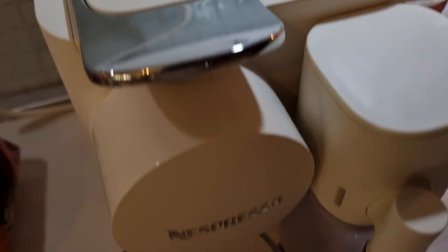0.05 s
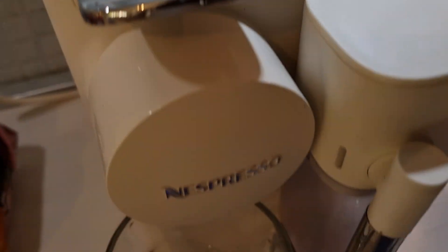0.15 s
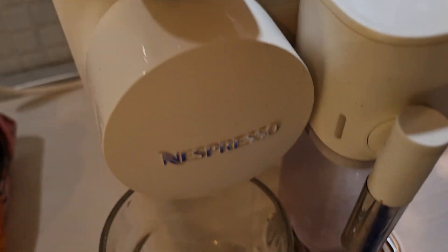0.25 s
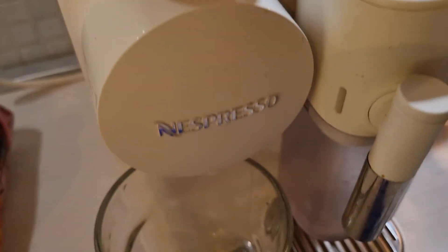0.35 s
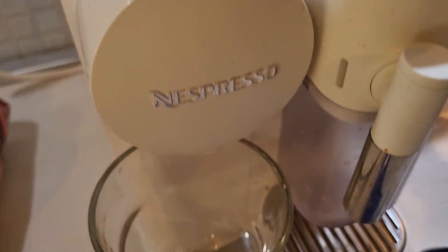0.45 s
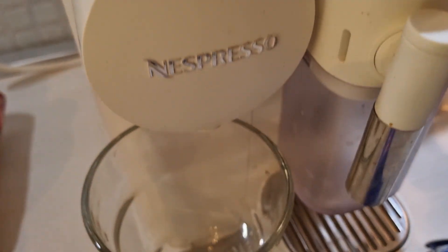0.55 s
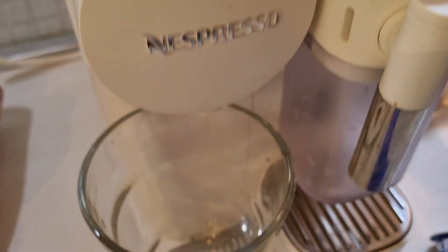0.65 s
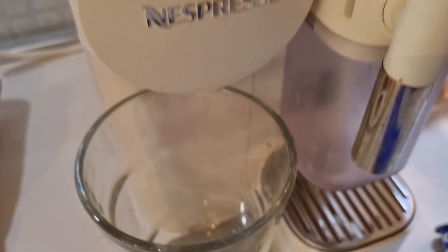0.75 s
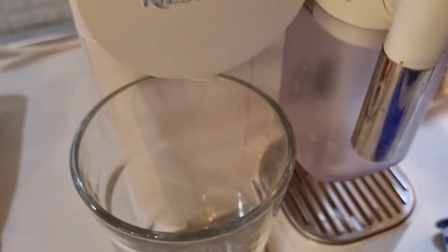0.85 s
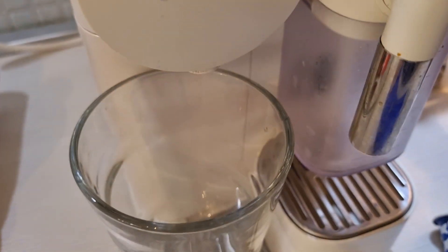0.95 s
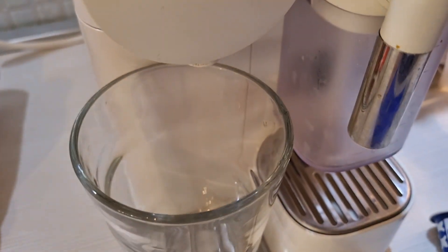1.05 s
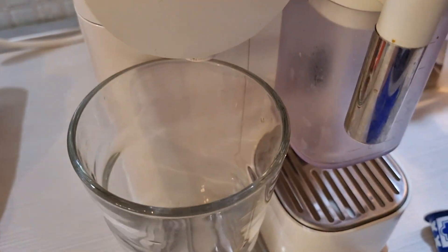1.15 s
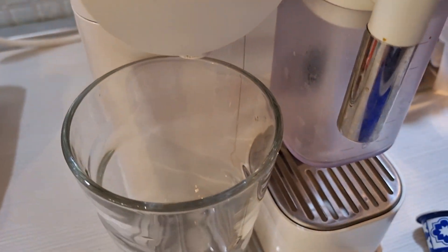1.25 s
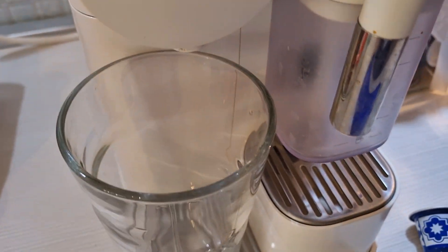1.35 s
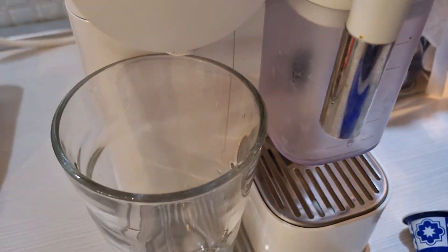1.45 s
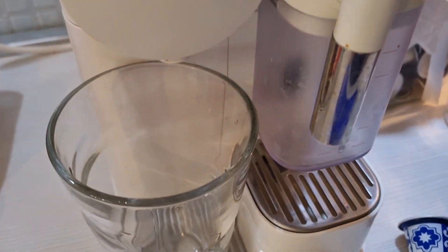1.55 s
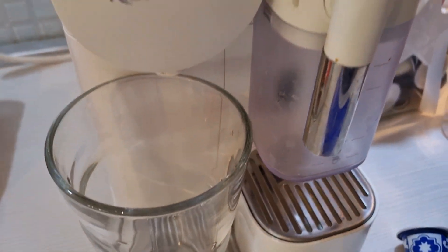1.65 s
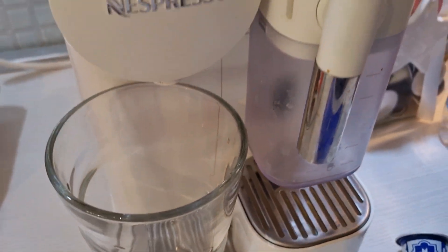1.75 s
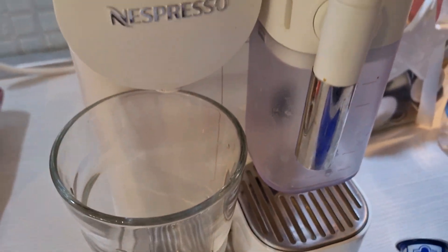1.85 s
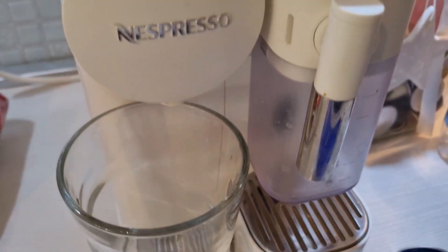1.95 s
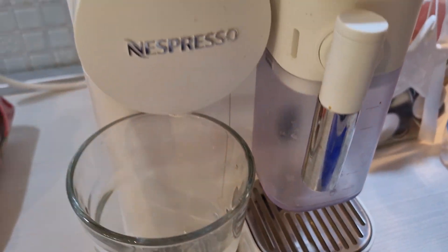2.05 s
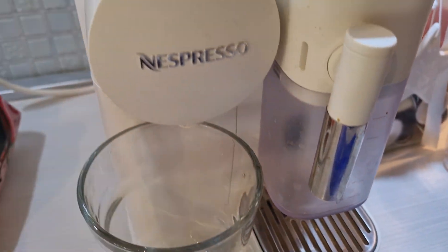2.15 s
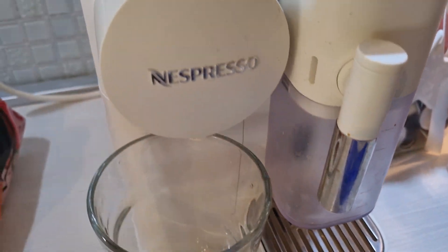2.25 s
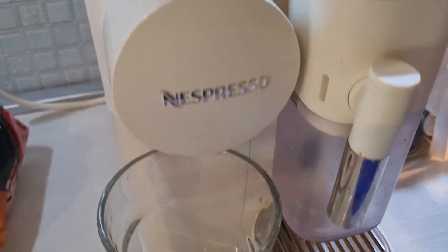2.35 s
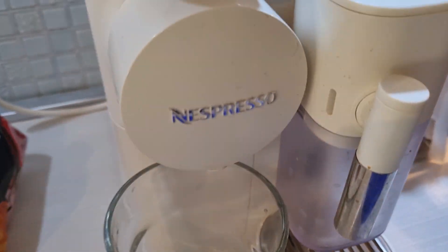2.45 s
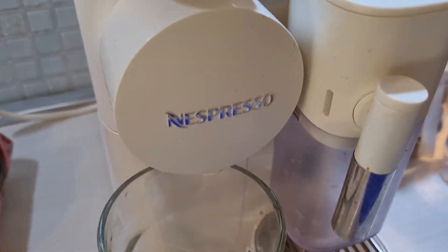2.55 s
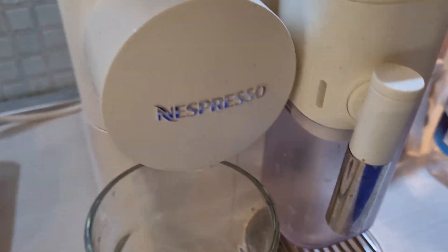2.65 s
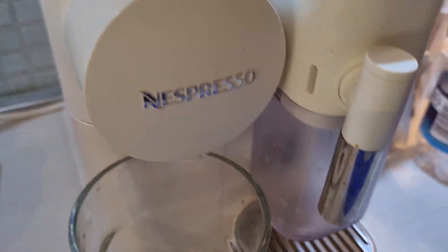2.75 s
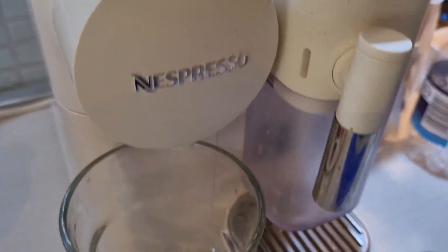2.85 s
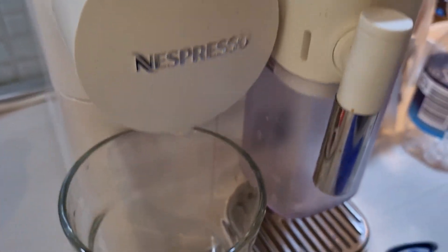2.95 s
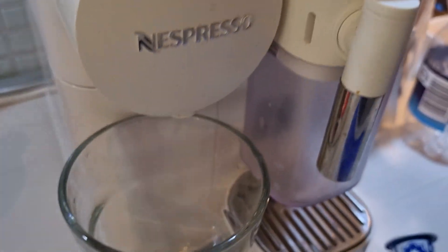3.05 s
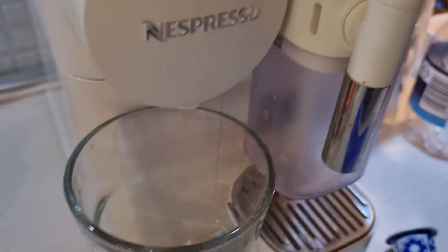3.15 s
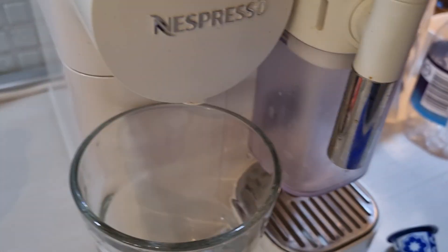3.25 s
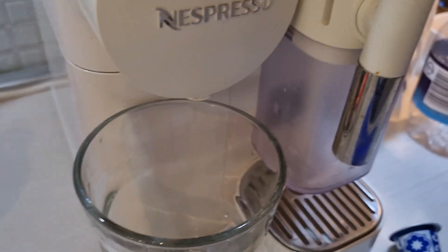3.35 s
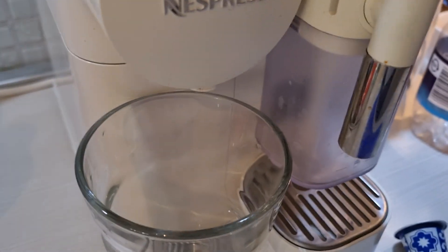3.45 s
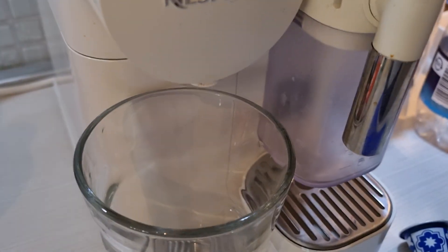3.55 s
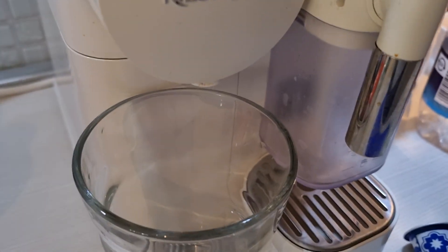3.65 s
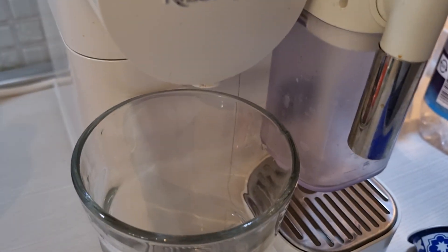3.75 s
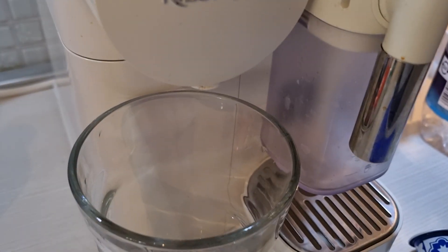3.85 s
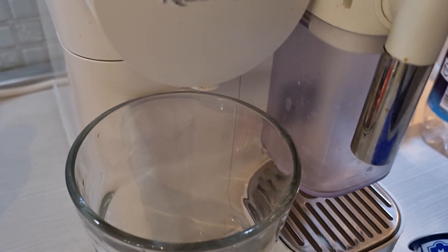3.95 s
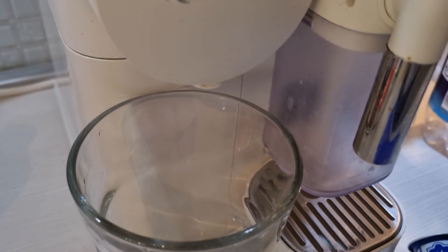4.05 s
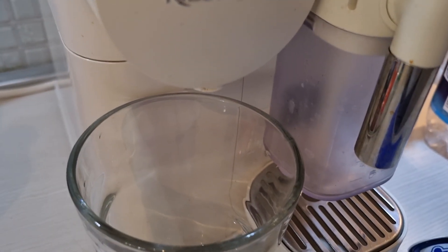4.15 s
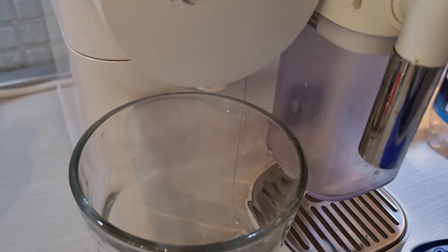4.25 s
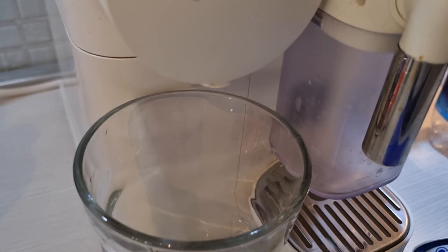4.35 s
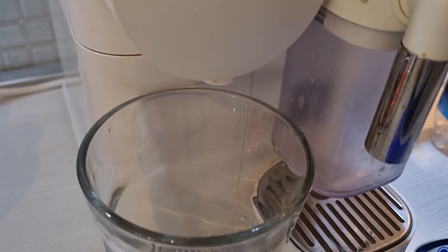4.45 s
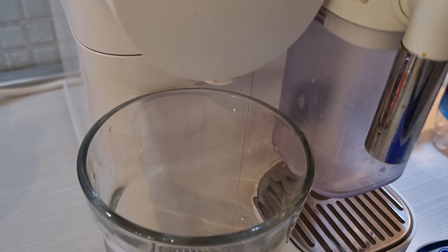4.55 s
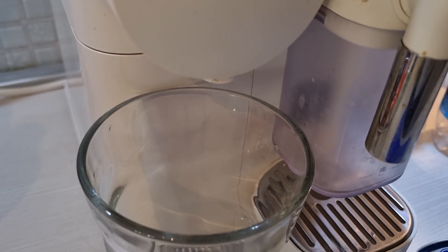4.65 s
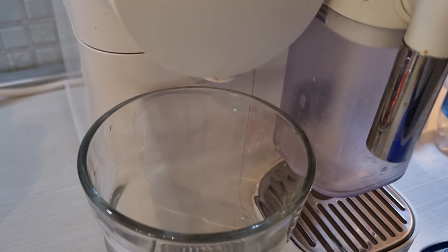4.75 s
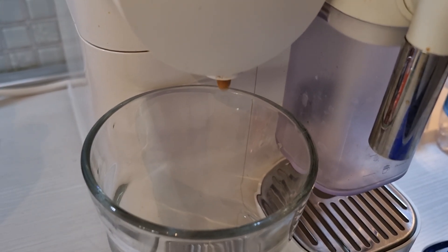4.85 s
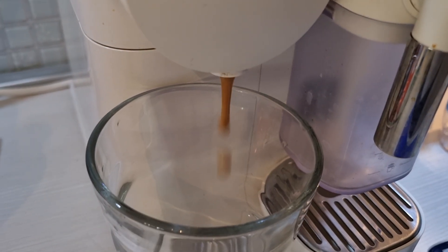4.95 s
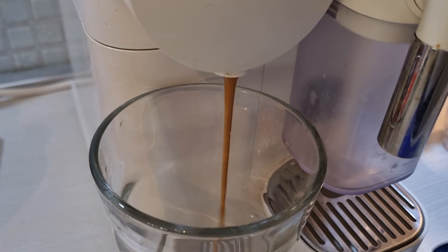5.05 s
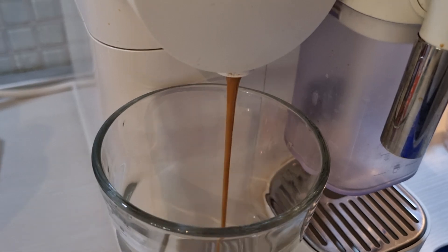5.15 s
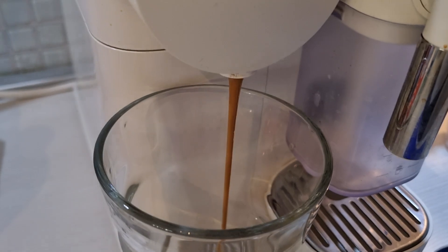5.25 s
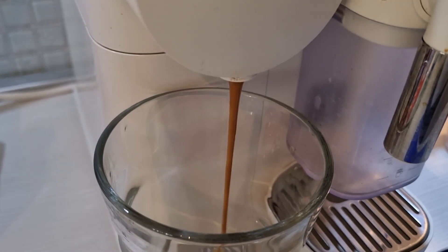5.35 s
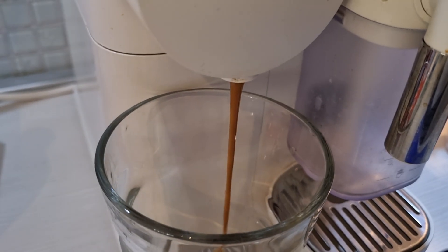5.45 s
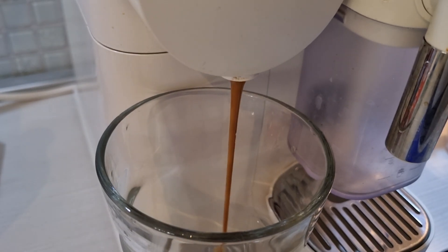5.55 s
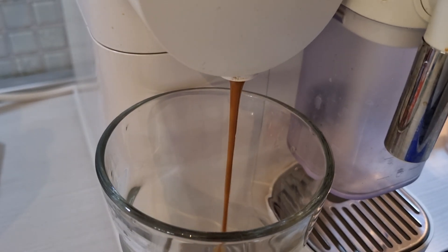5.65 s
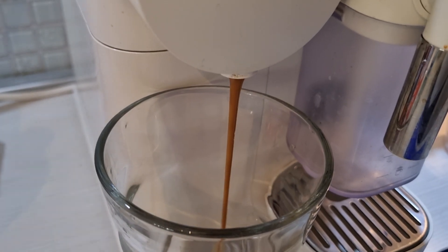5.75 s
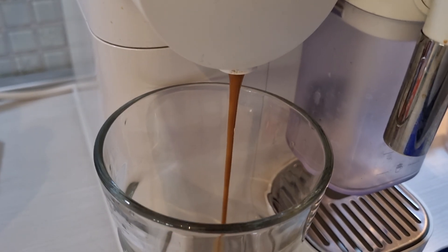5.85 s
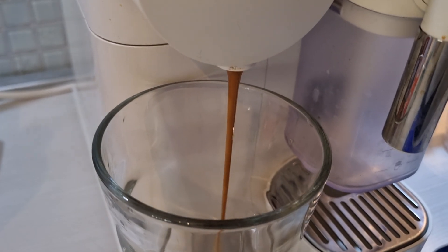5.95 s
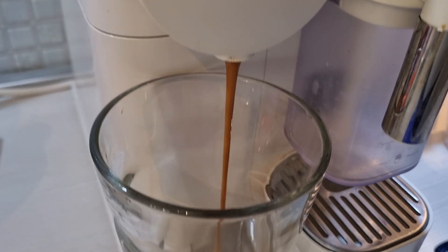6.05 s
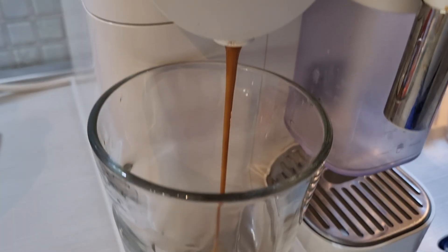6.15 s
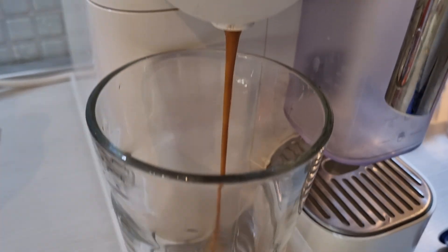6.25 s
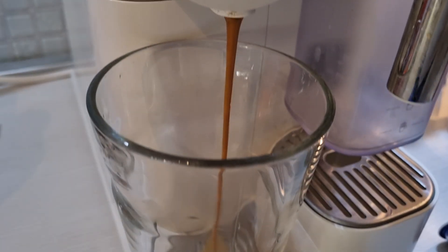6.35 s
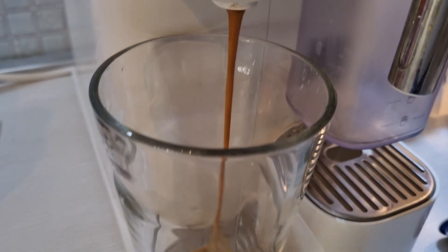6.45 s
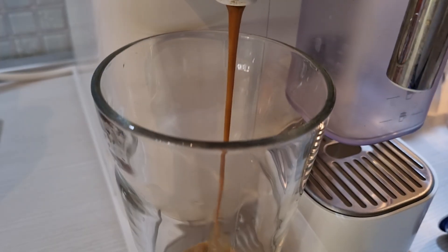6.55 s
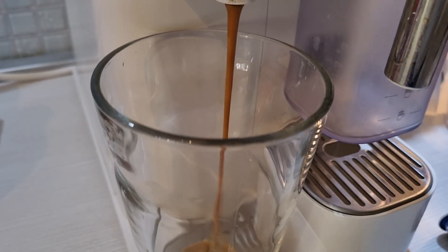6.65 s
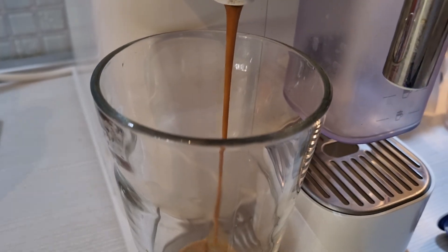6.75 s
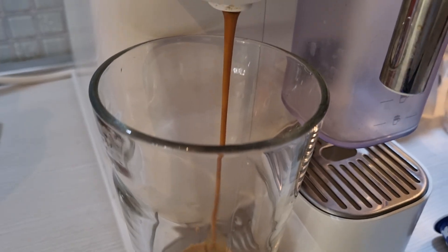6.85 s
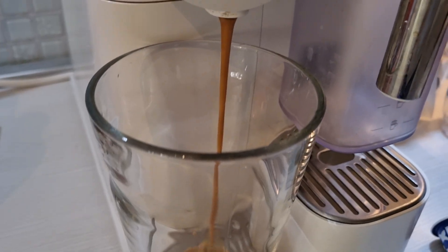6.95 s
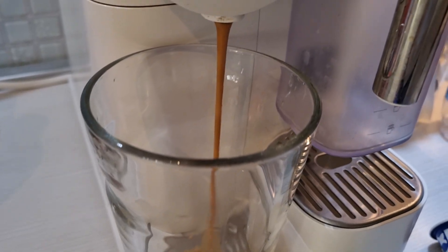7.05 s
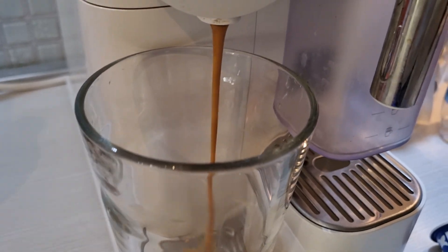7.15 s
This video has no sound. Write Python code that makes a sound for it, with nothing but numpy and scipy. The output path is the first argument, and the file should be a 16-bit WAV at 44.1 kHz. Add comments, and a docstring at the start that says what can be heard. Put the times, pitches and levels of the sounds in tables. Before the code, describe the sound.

Plastic parts are rubbed and knocked by hand, then after a brief hush a pump buzzes loudly, foil snaps, and coffee trickles into a glass.

```python
"""Capsule coffee machine on a kitchen counter

Faint room tone. A hand rubs and knocks plastic parts (stick-slip noise into resonances), then near quiet.
A mains-driven piston pump buzzes at 50 strokes a second: stroke-rate multiples plus ticks and gated noise,
loose and rattling at first, tighter as pressure builds. Scraped metal rings as the foil bursts;
coffee trickles into a glass as random pops through bubble resonances. Heard at a phone's two ports, close by."""
import sys
import numpy as np
from scipy import signal
from scipy.fft import rfft, irfft
from scipy.io import wavfile

SR = 44100
rng = np.random.default_rng(int(sys.argv[2]) if len(sys.argv) > 2 else 0)


def inscribe(sig):
    """Save sig as 16-bit PCM at rate SR to the path in sys.argv[1].

    A 1-D sig is mono; a 2-D sig holds one channel per row.
    Samples are clipped to [-1, 1] before scaling.
    """
    pcm = np.round(np.clip(np.atleast_2d(sig).T, -1, 1) * 32767)
    wavfile.write(sys.argv[1], SR, pcm.astype(np.int16))


N = 317520
T = np.arange(N) / SR
MAINS_HZ, PUMP_ON_S = 50, 2.277
PERIOD_MS = 1000 / MAINS_HZ
SIDES = np.array([[1], [-1]])  # left, right in opposite phase


def undb(db):
    """dB to amplitude ratio."""
    return 10 ** (np.asarray(db) / 20)


def unit(x):
    """Scale to RMS 1."""
    return x / np.sqrt(np.mean(x ** 2))


def curve(table):
    """Two-column table joined by straight lines in time."""
    t_s, value = np.transpose(table)
    return np.interp(T, t_s, value)


def bump(at_s, width_s):
    """Bell-shaped rise and fall, top 1."""
    return np.exp(-((T - at_s) / width_s) ** 2)


def touch(start_s, length_s, attack_s, release_s):
    """Envelope: straight attack, hold, exponential release."""
    attack = np.clip((T - start_s) / attack_s, 0, 1)
    return attack * np.exp(-np.maximum(T - start_s - length_s, 0) / release_s)


def walk(rate_hz):
    """Smooth random wander, spread about 1."""
    points = rng.standard_normal(int(N / SR * rate_hz) + 4)
    points = np.convolve(points, [.5, .7, .5], "same")
    return np.interp(T * rate_hz, np.arange(len(points)), points)


def pair(alike):
    """Noise at the two ports; alike (0-1) is the power share in phase, the rest is in opposite phase."""
    mid, side = rng.standard_normal((2, N))
    return np.sqrt(alike) * mid + np.sqrt(1 - alike) * side * SIDES


def crackle(per_s, spread_db):
    """Random slips of either sign and very uneven size."""
    chance = rng.random((3, N))
    slips = chance[0] < per_s / SR
    size = undb(-spread_db * np.log(chance[2] + 1e-4))
    return slips * np.sign(chance[1] - .5) * size


def colour(x, spectrum):
    """Filter by (f/Hz, level/dB) points, straight in log frequency."""
    hz, db = np.transpose(spectrum)
    f_hz = np.arange(N // 2 + 1) * SR / N + 1
    gain = undb(np.interp(np.log(f_hz), np.log(hz), db))
    return irfft(rfft(x) * gain, N)


def rings(x, modes):
    """Sum of resonances (f/Hz, width/Hz, level/dB), neighbours in opposite phase."""
    out = 0
    for k, (hz, width_hz, db) in enumerate(modes):
        out = out + (-1) ** k * undb(db) * signal.lfilter(*signal.iirpeak(hz, hz / width_hz, SR), x)
    return out


def split(x, hz, kind, order):
    """Butterworth low- or high-pass."""
    return signal.sosfilt(signal.butter(order, hz, kind, fs=SR, output="sos"), x)


# room tone spectrum: f/Hz, relative level/dB per Hz
ROOM_TONE = [(15, -39), (25, -15), (33, -17), (64, -8.5), (82, -2.5), (104, 0.5), (130, -8), (205, -18.5),
             (324, -12), (654, -28), (1320, -31.5), (6490, -43), (15800, -50)]
ROOM_TONE_DB = -69


def kitchen():
    """Faint room tone: coloured noise with a flickering level, bass alike on both sides."""
    mid, side = (colour(rng.standard_normal(N), ROOM_TONE) for _ in range(2))
    side = split(side, 400, "high", 1)
    return unit(mid + side * SIDES) * undb(ROOM_TONE_DB + 2.0 * walk(5.16))


# hand on the parts: start t/s, length/s, rub level/dB, skin hiss level/dB
RUBS = [(0.235, 0.068, -53, -58.5), (0.346, 0.016, -45, -51), (0.412, 0.12, -58, -66),
        (0.543, 0.11, -53.5, -57.5), (0.649, 0.088, -42, -52), (0.757, 0.017, -43, -48),
        (0.804, .12, -42, -54), (0.94, .12, -52.5, -53), (1.071, 0.14, -50, -58), (1.266, 0.4, -79, -82),
        (1.648, .12, -77, -82)]
# counter bumped: t/s, level/dB
THUDS = [(.285, -48), (.355, -48.5), (.56, -52), (.765, -43), (.92, -60), (1.1, -57), (1.174, -53),
         (1.675, -63)]
# plastic resonances: f/Hz, width/Hz, relative level/dB
PLASTIC = [(490, 70, -2), (1050, 160, -1), (1453, 180, 4), (1985, 400, 0.5), (3110, 100, -5.5),
           (3380, 310, -9), (5870, 1040, -6), (12600, 740, -10), (14600, 2000, -19.5)]
# resonance of the squeak in the last rub: f/Hz, width/Hz, relative level/dB
SQUEAK_MODE = [(1940, 57, 0)]
SQUEAK_S, SQUEAK_LENGTH_S, SQUEAK_DB = 1.7, 0.046, -66.5
LEAN_S, LEAN_LENGTH_S, LEAN_DB = 0.24, 0.68, -64.5
RUB_ATTACK_S, RUB_RELEASE_S = 0.028, 0.027
THUD_ATTACK_S, THUD_RELEASE_S = 0.0069, 0.02


def rub_envelope(start_s, length_s):
    """Onset and release of rubbing or leaning."""
    return touch(start_s, length_s, RUB_ATTACK_S, RUB_RELEASE_S)


def counter_thuds():
    """Noise through low resonances: the counter is bumped, and rumbles while the hand leans on it."""
    level = undb(LEAN_DB) * rub_envelope(LEAN_S, LEAN_LENGTH_S)
    for s, db in THUDS:
        level = level + undb(db) * touch(s, THUD_ATTACK_S, THUD_ATTACK_S, THUD_RELEASE_S)
    noise = rng.standard_normal(N) * undb(2 * walk(30))
    return level * unit(rings(noise, [(114, 23, 2), (420, 270, -12)]))


def hand():
    """Stick-slip rubbing rings the plastic; skin hisses above 2.8 kHz, the counter thuds."""
    rub, hiss = sum(undb(dbs)[:, None] * rub_envelope(s, length) for s, length, *dbs in RUBS)
    judder = signal.lfilter([1], [1, -.993], np.abs(crackle(90, 4.9)))
    slips = pair(0.4) + .5 * unit(crackle(900, 1.9))
    slips = slips * (3.7 + unit(judder))
    body = undb(-29.0) * slips
    for k, mode in enumerate(PLASTIC):
        # the grip shifts, so each resonance comes and goes on its own
        body = body + (-1) ** k * undb(3.3 * walk(29.8)) * rings(slips, [mode])
    low, high = (split(body, 2800, kind, 3) for kind in ("low", "high"))
    squeak = undb(SQUEAK_DB) * rub_envelope(SQUEAK_S, SQUEAK_LENGTH_S) * unit(rings(slips, SQUEAK_MODE))
    return rub * unit(low) + hiss * unit(high) + counter_thuds() + squeak


# knocks: t/s, level/dB, ring f/Hz, crack level/dB re the knock
KNOCKS = [(0.274, -36.5, 1150, -22), (0.292, -41, 1900, -2), (0.302, -40, 1220, -24),
          (0.315, -26.5, 1074, -30), (0.357, -30.5, 1380, -13), (0.366, -38.5, 880, -20),
          (0.487, -42.5, 1120, -31), (0.559, -38.5, 1140, -25), (0.572, -40, 980, -27),
          (0.666, -39, 1420, -13), (0.725, -39, 1490, -19), (0.766, -30, 1450, -16),
          (0.811, -49, 1620, -22), (0.841, -35.5, 1530, -16), (0.877, -32, 1470, -13),
          (0.922, -33.5, 1530, -16), (0.988, -35.5, 1860, -5.5), (1.105, -40, 1520, -20),
          (1.154, -36, 1020, -39), (1.212, -54, 1560, 7), (1.327, -58, 1920, -10), (1.37, -51.5, 495, -30),
          (1.672, -58, 1860, -20), (1.756, -60, 1960, -28), (2.279, -26, 370, -1.5),
          (4.211, -24, 2110, -22), (4.317, -37, 1960, -12), (4.344, -25, 1300, -13),
          (7.086, -25, 1198, -34)]


def knocks():
    """Each knock: a short decaying ring with an overtone, a treble crack and a noisy tail."""
    out, t = np.zeros(N + 4096), T[:4096]
    for s, db, hz, crack_db in KNOCKS:
        noise = rng.standard_normal((2, len(t)))
        ring = np.sin(2 * np.pi * hz * t) * np.exp(-t / 0.0041)
        overtone = .5 * np.sin(2 * np.pi * 1.65 * hz * t) * np.exp(-t / 0.0021)
        tail = 0.68 * signal.lfilter(*signal.iirpeak(hz, 1.2, SR), noise[0]) * np.exp(-t / 0.019)
        crack = undb(crack_db) * np.diff(noise[1], prepend=0) * 0.7 * np.exp(-t / 0.0046)
        onset = 1 - np.exp(-t / 0.00037)
        start = int(s * SR)
        out[start:start + len(t)] += undb(db) * (ring + overtone + tail + crack) * onset
    return out[:N]


# case and counter, one row per multiple 1-7 of the stroke rate:
# level/dB at rest, then dB added at full pressure, at full stroke, at the top of the swell
BOOM = [(-51, -3.5, 1.2, 2.5), (-48, 0.5, 7.5, 8.5), (-43.5, 4.5, 13, 1.1), (-35.5, -4, -2.5, 3),
        (-30.5, -5, 6.5, -3), (-41, -10, 1.2, 1), (-49.5, 4.5, 25, -13)]
# brief fades and swells, {multiple: rows of t/s, width/s, level change/dB}
WAVERS = {1: [(2.33, 0.047, 8)], 4: [(3.86, 0.16, -12), (4.92, 0.43, -11.5)], 5: [(4.2, 0.2, -2.5),
          (4.75, 0.32, 4)], 6: [(3.4, 0.13, 5), (4.05, 0.089, 10), (4.65, 0.1, -8.5)]}


def boom(back, state, loose):
    """Stroke-rate multiples 1-7; a loose case lets its resonances slide, so they drift apart in phase."""
    levels_db = np.array(BOOM) @ state
    for k, wavers in WAVERS.items():
        levels_db[k - 1] += sum(db * bump(s, width) for s, width, db in wavers)
    out = 0
    for k, db in enumerate(levels_db, start=1):
        level = np.sqrt(2) * undb(db + 0.39 * loose * walk(25.55))
        drift_rad = 0.063 + loose * (2.37 * walk(1.26) + 0.089 * walk(8.9))
        out = out + level * np.cos(2 * np.pi * k * back + drift_rad)
    return out


def rumble(loose):
    """Noise through broad low resonances, louder while the case is loose."""
    noise = rng.standard_normal(N)
    return undb(-49 + 7.6 * loose) * unit(rings(noise, [(74.0, 32, -1), (197, 163, 1), (607, 890, -10)]))


# multiples 8 up: level/dB re the buzz when pumping freely, level/dB re the buzz against the coffee
PARTIALS = [(-12, -2.5), (-22, -4.5), (-21, -7), (-15.5, 3), (-20, -5), (-19, 3.5), (-20, -11.5),
            (-6.5, -8), (-15.5, -20), (-17, -15), (-16.5, -9), (-16, -60), (-15, -9.5), (-14, -18),
            (-9.5, -20), (-15, -6), (-42, 0)]
SPREAD_RAD = .012  # phase lag, times multiple squared


def buzz(back, pressure, loose):
    """Stroke-rate multiples from 8 up; pressure shifts the balance, looseness makes them waver."""
    out = 0
    for k, (free_db, loaded_db) in enumerate(PARTIALS, start=8):
        db = free_db + pressure * (loaded_db - free_db) + 2 * loose * walk(12)
        drift_rad = loose * (2.0 * walk(0.56) + 0.76 * walk(13))
        out = out + undb(db) * np.cos(2 * np.pi * k * back - SPREAD_RAD * k ** 2 + drift_rad)
    return out


# piston bounces: delay after strike/ms, level/dB, noise decay/ms
BOUNCES = [(0, 2.5, 0.8), (1.6, -7.5, 4.5), (3.8, -5.5, 1.6), (9.5, -9, 1.44)]


def strike_ticks(strike, loose):
    """One impulse train per bounce, of uneven size while loose."""
    uneven = undb(1.5 * loose * rng.standard_normal(N))
    ticks = []
    for at_ms, db, _ in BOUNCES:
        hit = np.diff(np.floor(strike - at_ms / PERIOD_MS), prepend=0) > 0
        ticks.append(undb(db) * uneven * hit)
    return ticks


def strike_gate(strike, loose):
    """Noise level within each stroke: a floor plus a decay per bounce; strokes differ while loose."""
    gate = 0.31
    for at_ms, db, decay_ms in BOUNCES:
        gate = gate + undb(db) * np.exp(-((strike * PERIOD_MS - at_ms) % PERIOD_MS) / decay_ms)
    stroke_number = (strike - strike.min()).astype(int)
    return gate * undb(0.52 * loose * rng.standard_normal(N // 800)[stroke_number])


# pump bracket, short rings while loose: f/Hz, width/Hz, relative level/dB
BRACKET_FREE = [(1385, 47, 3), (1700, 53, -18)]
# pump bracket, longer rings once held tight: f/Hz, width/Hz, relative level/dB
BRACKET_LOADED = [(1455.5, 10, 21.5), (1220, 120, -10.5), (1522, 9, 3.5)]


def bracket(tick, pressure):
    """First tick of each stroke rings the bracket; pressure crossfades loose to tight."""
    free = unit(rings(rings(tick, [(1396, 480, 0)]), BRACKET_FREE))
    loaded = unit(rings(rings(tick, [(1293, 190, 0)]), BRACKET_LOADED))
    return (1 - pressure) * free + undb(-2.0) * pressure * loaded


def stroke_habit():
    """Noise in mains-period frames, each much like the one before."""
    frames = pair(.7).reshape(2, -1, SR // MAINS_HZ)
    return unit(signal.lfilter([1], [1, -.97], frames, axis=1).reshape(2, N))


# loose panels: f/Hz, width/Hz, relative level/dB
PANELS = [(731, 56, 0.5), (970, 310, -3.5), (1477, 159, 6), (1906, 103, -3), (2175, 840, -9)]


def rattle(gate, habit, alike):
    """Stroke-gated noise and crackle through the panel resonances."""
    fresh = pair(0.86) + 0.46 * unit(crackle(1500, 1.2))
    return unit(rings(gate * (np.sqrt(alike) * habit + np.sqrt(1 - alike) * fresh), PANELS))


# panel rasps, while the case is loose and again as coffee flows: t/s, width/s, level/dB
RASPS = [(3.15, 0.54, -35.5), (5.5, .6, -51)]
# rasping panel: f/Hz, width/Hz, relative level/dB
RASP_MODES = [(1820, 160, 8.5), (2050, 210, 6)]


def rasp(gate):
    """Stroke-gated, unsteady noise through panel resonances, in two swells."""
    level = sum(undb(db) * bump(s, width) for s, width, db in RASPS)
    return level * unit(rings(gate * pair(.7) * undb(6.4 * walk(20)), RASP_MODES))


# chatter hiss spectrum: f/Hz, relative level/dB per Hz
CHATTER = [(1060, -13.5), (1800, 0), (3490, -2), (4010, -2.5), (4630, -4.5), (7500, -14.5), (8290, -31.5),
           (9080, -27), (10900, -28.5), (14600, -28.5), (15800, -44)]
# valve and piston housing: f/Hz, width/Hz, relative level/dB
VALVE = [(1930, 90, -1), (2450, 40, -5), (2610, 50, 0), (3260, 60, -8), (3950, 130, 0), (4300, 90, -5),
         (5600, 200, -7), (7300, 250, -14), (9400, 400, -21), (13000, 600, -20)]


def chatter(gate, habit, alike, ticks, bright_db, pressure):
    """Gated noise as hiss, plus the housing rung by noise and ticks, stronger under pressure."""
    shake = gate * (np.sqrt(alike) * habit + np.sqrt(1 - alike) * pair(0.25))
    hiss = colour(shake, CHATTER)
    # extra gating sharpens the puffs above 8 kHz
    hiss = hiss + undb(bright_db) * unit(gate) ** 0.33 * split(hiss, 8000, "high", 2)
    housing = unit(rings(shake, VALVE)) + undb(-12.0) * unit(rings(sum(ticks), VALVE))
    return unit(hiss) + undb(4 * pressure - 4) * housing


# piston stroke grows, stalls while the foil resists, recovers, settles: t/s, stroke length 0-1
STROKE = [(2.5, 0.07), (2.95, .48), (3.4, 0.88), (3.7, 0.93), (3.9, 0.64), (4.15, 0.1), (4.5, .19),
          (4.7, 0.52), (4.95, 0.66), (5.45, 0.4), (6.2, 0.21), (7.2, .13)]
# t/s, water pressure 0-1
PRESSURE = [(3.2, 0.06), (4.2, 0.42), (5.2, .53), (6.35, 0.66)]
# each: level/dB at rest, then dB added at full pressure, at full stroke, at the top of the swell
BUZZ_DB = (-39.5, -3.5, 5, 1)
BRACKET_DB = (-37.5, -8.5, 3, 0.2)
RATTLE_DB = (-43.5, -5.5, 1, 8.5)
CHATTER_DB = (-44, -8.5, 5, 1)
# same columns: added hiss above 8 kHz re the rest
BRIGHT_DB = (7.5, -4, -1.5, 6)
SWELL_S, SWELL_WIDTH_S = 4.09, 1.59
STRIKE_MS, LONG_STROKE_MS, PRESSED_MS = 12, .6, -.9  # strike into each mains cycle; added at full stroke, pressure
RETURN_MS = 5.43  # spring throws the piston back against its stop


def pump():
    """Stroke-rate multiples from the piston return; ticks and noise from each strike and bounce."""
    stroke, pressure = curve(STROKE), curve(PRESSURE)
    state = np.array([np.ones(N), pressure, stroke, bump(SWELL_S, SWELL_WIDTH_S)])
    level_tables = np.array([BUZZ_DB, BRACKET_DB, RATTLE_DB, CHATTER_DB, BRIGHT_DB])
    buzz_db, bracket_db, rattle_db, chatter_db, bright_db = level_tables @ state
    loose = 1 - .9 * pressure

    # piston positions in cycles
    strike = MAINS_HZ * T - (STRIKE_MS + LONG_STROKE_MS * stroke + PRESSED_MS * pressure) / PERIOD_MS
    # alternate strokes differ a little, which sounds half-way tones
    alternate = 0.002 * np.sin(np.pi * MAINS_HZ * T)
    back = MAINS_HZ * T - RETURN_MS / PERIOD_MS + alternate + 0.0017 * loose * walk(40)

    ticks = strike_ticks(strike, loose)
    gate = strike_gate(strike, loose)
    # valve and panels shake much as they did a stroke ago, the more so under pressure
    habit = stroke_habit()
    alike = np.clip(.2 + 1.1 * pressure ** 2, 0, .97)

    out = boom(back, state, loose) + rumble(loose)
    out = out + undb(buzz_db) * buzz(back, pressure, loose)
    out = out + undb(bracket_db) * bracket(ticks[0], pressure)
    out = out + rasp(gate)
    out = out + undb(rattle_db) * rattle(gate, habit, alike)
    out = out + undb(chatter_db) * chatter(gate, habit, alike, ticks, bright_db, pressure)
    return out * np.clip((T - PUMP_ON_S) / 0.0091, 0, 1)


# scrapes: start t/s, length/s, bite at the start/dB,
# then level/dB of rings near 9 kHz, at 12-15 kHz, near 2 kHz, and of the broad hiss
FOIL = [(4.207, 0.095, 9.5, -51.5, -58, -42.5, -66), (4.312, 0.038, -10, -59, -48, -37.5, -42.5)]
# three ring groups, same order: f/Hz, width/Hz, relative level/dB
FOIL_RINGS = [
    [(8970, 90, 5), (9300, 84, -3)],
    [(12100, 300, -5), (14800, 200, -1)],
    [(2020, 57, 0)],
]
FOIL_ATTACK_S, FOIL_RELEASE_S, FOIL_BITE_S = 0.0045, .012, 0.0057
FOIL_PANS_DB = (5., 0., -3.)  # left up, right down by this; the 9 kHz whistle sits left


def foil():
    """Bursting foil: a two-part scrape of noise and crackle rings metal in three groups."""
    scrape = pair(0.25) + unit(crackle(800, 1.5))
    levels = 0
    for s, length, bite_db, *dbs in FOIL:
        hold = touch(s, length, FOIL_ATTACK_S, FOIL_RELEASE_S)
        bite = undb(bite_db) * touch(s, FOIL_ATTACK_S, FOIL_ATTACK_S, FOIL_BITE_S)
        levels = levels + undb(dbs)[:, None] * (hold + bite)
    *ring_levels, hiss_level = levels
    out = hiss_level * unit(scrape)
    for level, group, pan_db in zip(ring_levels, FOIL_RINGS, FOIL_PANS_DB):
        out = out + level * undb(pan_db * SIDES) * unit(rings(scrape, group))
    return out


# coffee flow: t/s, level/dB
TRICKLE = [(4.5, -54), (4.7, -40.5), (5.3, -42.5), (6.3, -46), (6.6, -48.5), (7.2, -47.5)]


def trickle():
    """Small bubbles popping in spout and glass: random impulses through bubble resonances."""
    pops = crackle(500, 2) * undb(3 * walk(25))
    bubbles = rings(pops, [(816, 210, -14.5), (915, 110, -5), (1127, 340, -10.5), (1980, 130, -10.5)])
    return undb(curve(TRICKLE)) * unit(bubbles) * (T > TRICKLE[0][0])


def counter(near, t60_s=0.06, wet_db=-5.0):
    """Left port nearer; bright side echoes off tiles and glass reach the ports in opposite phase."""
    t = T[:int(.15 * SR)]
    echoes = rng.standard_normal(len(t)) * undb(-60 * t / t60_s) * (t > .0006)
    echoes = split(unit(echoes) / np.sqrt(len(t)), 500, "high", 2)
    direct = np.array([near[0], np.roll(near[1], 5)])  # right 5 samples late
    wet = signal.fftconvolve(near.mean(axis=0), echoes)[:N]
    return direct + undb(wet_db) * wet * SIDES


HAND_PAN_DB = -4  # left re right


def scene():
    """Machine near centre, hand to the right, counter echoes, room tone."""
    machine = (pump() + trickle()) * undb(-.3 * SIDES)
    # knocks before the pump starts come from the hand on the right
    pan_db = HAND_PAN_DB * (T < PUMP_ON_S)
    handling = (hand() + knocks()) * undb(pan_db * SIDES / 2)
    return counter(machine + foil() + handling) + kitchen()


TOP_HZ = 15800


def record(dry):
    """The phone cuts the top: steep elliptic low-pass."""
    return signal.sosfilt(signal.ellip(12, .2, 90, TOP_HZ, fs=SR, output="sos"), dry)


dry = scene()
out = record(dry)
inscribe(out)
```